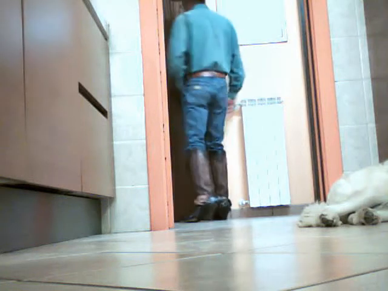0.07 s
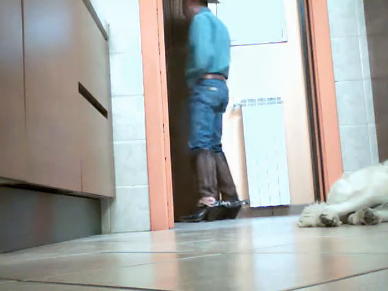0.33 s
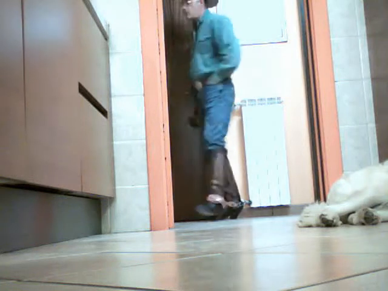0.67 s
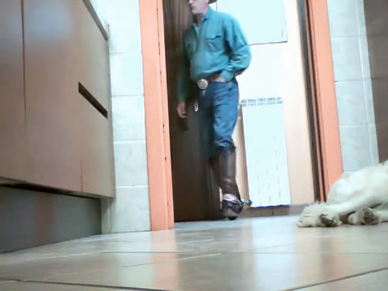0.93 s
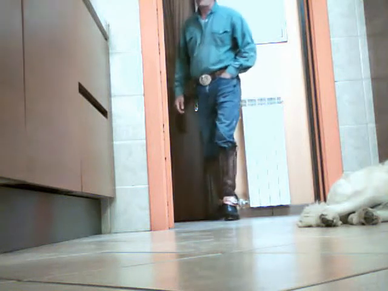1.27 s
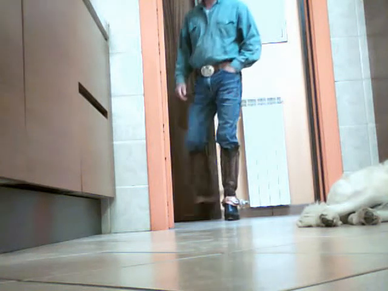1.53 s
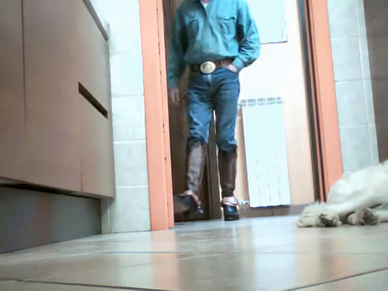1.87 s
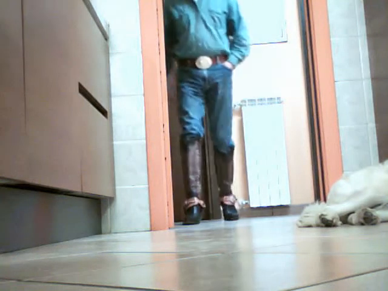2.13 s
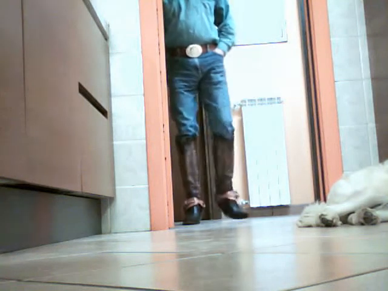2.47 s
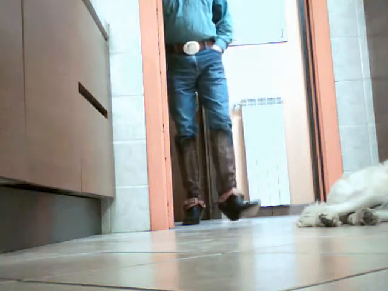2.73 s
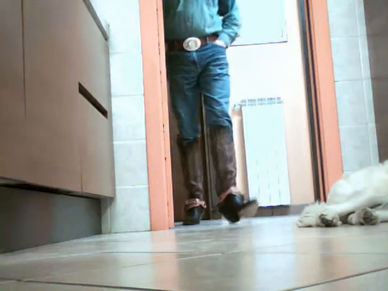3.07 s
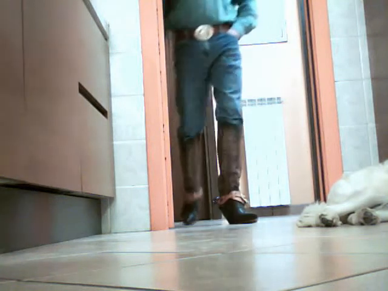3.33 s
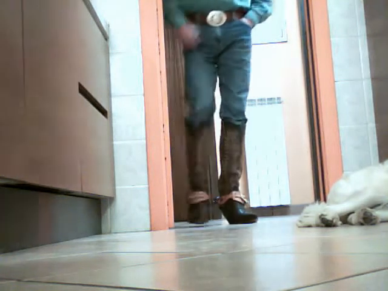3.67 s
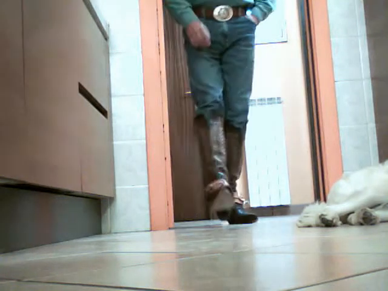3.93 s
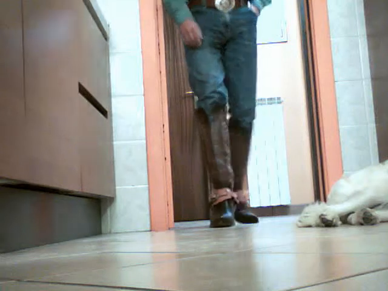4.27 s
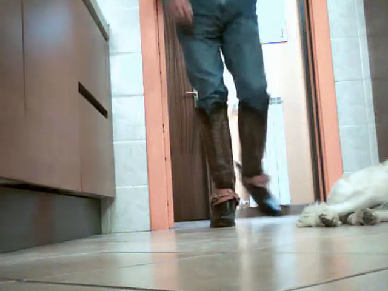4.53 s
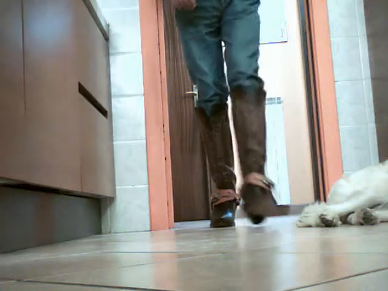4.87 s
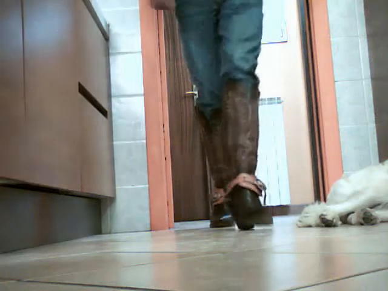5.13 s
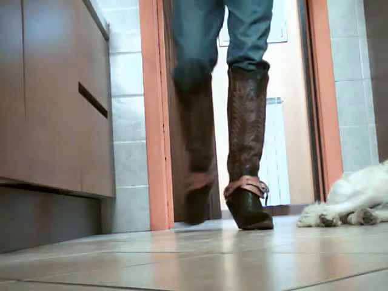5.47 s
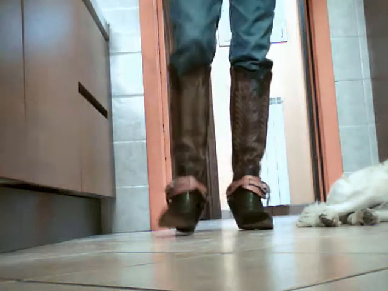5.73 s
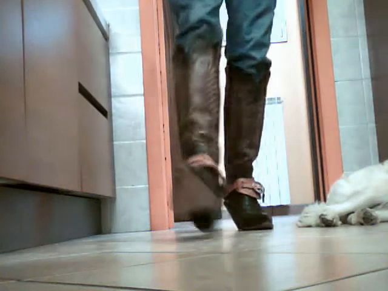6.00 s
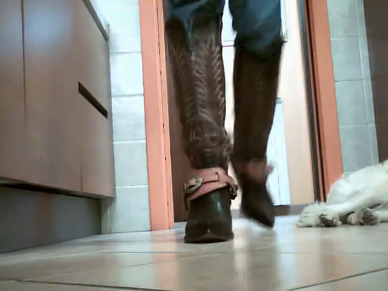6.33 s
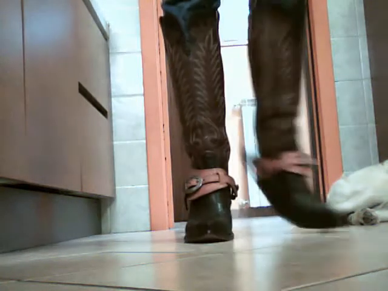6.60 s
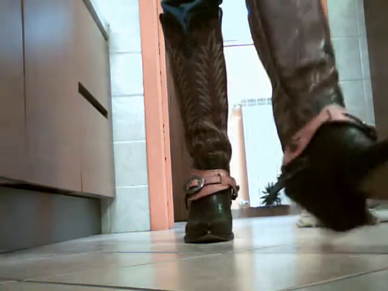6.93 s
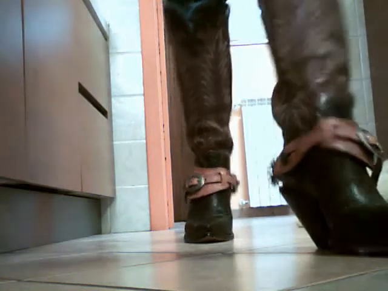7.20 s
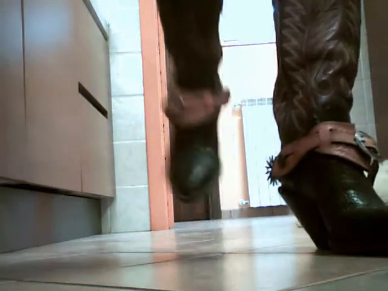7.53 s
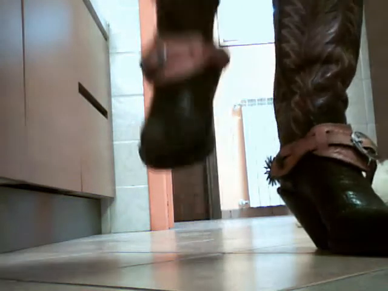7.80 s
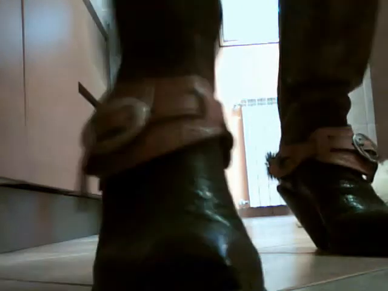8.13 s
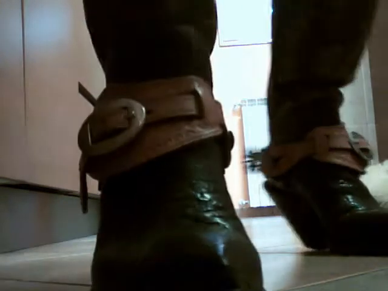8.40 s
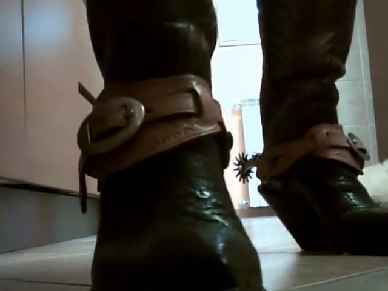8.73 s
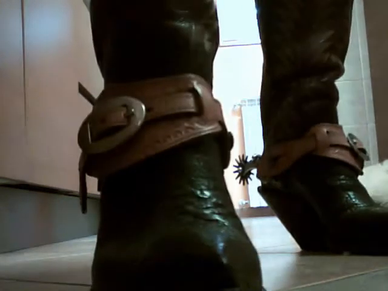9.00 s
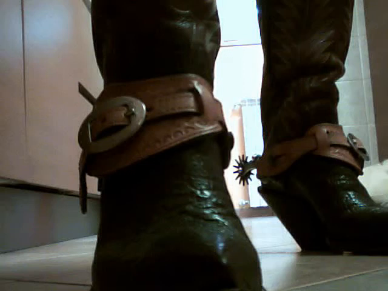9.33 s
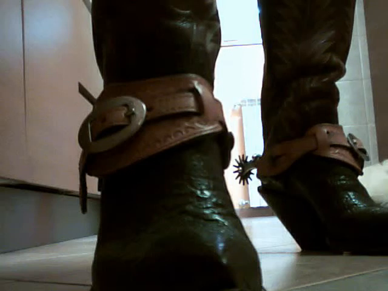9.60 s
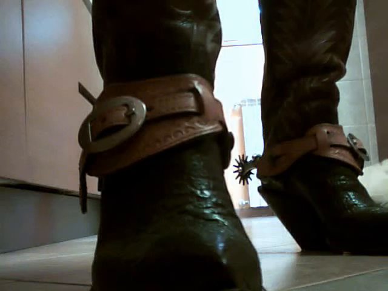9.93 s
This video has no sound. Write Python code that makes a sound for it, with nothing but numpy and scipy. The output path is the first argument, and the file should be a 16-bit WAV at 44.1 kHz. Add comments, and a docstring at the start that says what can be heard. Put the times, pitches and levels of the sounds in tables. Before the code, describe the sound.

Boots walk slowly over tiles in a small, echoing room, about one step a second. Each heel thumps, loose metal spurs clack and their wheels ring with a thin, high tone, while leather rustles faintly. The steps grow louder as they near the microphone and end in one very loud, distorted stamp. The spurs rattle and ring out, leaving a low, steady hiss.

```python
"""Riding boots with spurs walk slowly over tiles towards the microphone and stamp in front of it.
Each heel thumps, the loose spurs clack on the boots, and their two star-shaped wheels ring near 6 kHz.
The leather rustles as the boots bend, and the small, hard room echoes every knock.
The stamp overloads the microphone's input, whose steady hiss lies under everything."""
import sys
import numpy as np
from scipy import signal
from scipy.fft import rfft, irfft
from scipy.io import wavfile

SR = 44100
rng = np.random.default_rng(int(sys.argv[2]) if len(sys.argv) > 2 else 0)


def dump(signal):
    """Clip the signal to [-1, 1] and save it as 16-bit WAV at the path in sys.argv[1]."""
    limited = np.clip(np.atleast_2d(signal).T, -1, 1)
    pcm = np.round(limited * 32767).astype(np.int16)
    wavfile.write(sys.argv[1], SR, pcm)


N = 439677
TIME = np.arange(N) / SR
AGE = np.arange(int(.8 * SR)) / SR   # seconds since a knock began

# Levels in the tables are relative: the functions add their own gains.
# the tone of the hiss: pitch_hz, level_db
HISS_SHAPE = [(20, 3), (80, 6), (125, -5), (250, 3.5), (700, 1), (1300, -0.5), (4500, -1.5), (7000, -3.5),
              (7600, -10.5)]
# a faint, steady whine: pitch_hz, width_hz, level_db
WHINE_BANDS = [(869.7, 17, -65.5), (1763, 5.6, -69.5)]
# notes that linger between the walls (standing waves): pitch_hz, level_db
ROOM_NOTES = [(152, -35), (220, -24), (277, -25.5), (433, -28)]
# how far away the walker is: time_s, distance_m
WALK_PATH = [(0, 5), (3.2, 6.2), (4.3, 6.1), (5.3, 2.1), (6.2, 2.9), (7.3, 1.35), (8.3, 2.4)]
# a boot bends as the weight rolls onto it: deepest_bend_s, level_db
BOOT_BENDS = [(0.3, -45), (1.33, -52.5), (2.32, -44.5), (3.4, -49.5), (4.38, -40), (5.42, -40.5),
              (6.33, -40), (7.35, -40.5)]
# the tone of rustling leather and buckles: pitch_hz, width_hz, level_db
LEATHER_BANDS = [(665, 1050, -14.5), (1620, 2750, -5.5), (2880, 1930, -1.5), (3640, 680, -3.5),
                 (4370, 5600, -15), (7140, 3000, -21)]
# flicks that set each spur's wheel ringing: start_s, level_db, high_over_low_db, base_ring_s
RIGHT_WHEEL_FLICKS = [(0.078, -47.5, 2, 0.45), (0.223, -49.5, -1, 0.73), (0.717, -52.5, 4, 0.54),
                      (1.1, -63, 12, 3), (1.752, -56, 4, 2.5), (2.375, -50.5, -2, 2.6),
                      (3.762, -48.5, -1, 0.93), (4.48, -53.5, 12, 2.2), (5.50, -57.5, -11, 0.61),
                      (5.70, -52, 10, 4.6), (7.68, -58, -7.5, 2.4), (7.946, -44.5, -5.5, 0.85),
                      (8.195, -48, -1, 0.76), (8.275, -40, -3, 2.93), (8.583, -41.5, 4.5, 0.77)]
LEFT_WHEEL_FLICKS = [(0.748, -48, 7, 0.82), (1.241, -50, 7, 2.3), (1.53, -47, 4, 3.2),
                     (2.87, -45.5, -5, 2.2), (3.466, -42.5, 2, 2.3), (4.728, -47, -2, 1.5),
                     (6.003, -43, 9.5, 2.1), (6.26, -44.5, -5.5, 2), (6.738, -42.5, 0.5, 2.6),
                     (7.025, -43, -3, 0.9)]
# each wheel's notes: pitch_hz, level_db, ring_share, side (-1 low, 0 middle, 1 high)
RIGHT_WHEEL_NOTES = [(5761, 0, 1, -1), (5800, -3, .3, 0), (5874, 0, .75, 1)]
LEFT_WHEEL_NOTES = [(5924, 0, 1, -1), (5948, -4, .5, -1), (6107, 0, 1, 1), (6140, -4, .45, 1)]
# a spur knocks on its boot: start_s, level_db, strap_db, shank_db, edge_db (last three add to level_db)
SPUR_KNOCKS = [(0.079, -35, -11, 0.5, -9), (0.223, -32.5, -20, 3, -15), (0.2356, -37, -10, -2, -4),
               (0.7377, -33.5, -11, 3.5, -7), (1.1237, -36, -15, -5, -13), (1.241, -38.5, -5, 0, -10),
               (1.466, -36, -20, -1, -8), (1.5138, -39, -13, -5, -15), (2, -38, -14, -1, -8),
               (2.146, -34.5, -25, -2, -7), (2.192, -24.5, -17, -9, -16), (2.2717, -27, -14.5, -8, -17),
               (2.375, -33.5, -8.5, -3.5, -9), (2.6352, -38.5, -20, -6, -17), (2.7965, -45, -14, -0.5, -19),
               (3.2152, -25.5, -11.5, 2, -8.5), (3.465, -33.5, -6.5, 0.5, -11), (3.5482, -41, 1, 2.5, 2.5),
               (3.761, -34, -14, -2, -8), (4.2015, -28, -11.5, -7, -12), (4.2591, -24.5, -13, -9, -15.5),
               (4.3067, -26.5, -12, -7, -8.5), (4.478, -34.5, -9, -0.5, -6), (4.728, -36, -19, -10, -10),
               (5.089, -42, -2.5, -1, -15), (5.2017, -37, -2.5, -6, -21), (5.226, -31, -23, -7, -15),
               (5.268, -16.5, -15.5, -15, -22), (5.3615, -19, -18, -25, -20),
               (5.4831, -19.5, -18, -19, -18), (5.6153, -27.5, -30, -28, -35), (5.6576, -22, -38, -21, -29),
               (5.7003, -32.5, -8.5, -2, -3), (5.899, -32.5, -16, -5, -6), (5.949, -39, 0.5, -11, -6),
               (6.0032, -25, -6, -4, -26.5), (6.0182, -23.5, -15.5, -19, -20),
               (6.2127, -16.5, -12.5, -6.5, -14.5), (6.26, -24, -8.5, -3, -10),
               (6.2902, -24.5, -8, -9, -12), (6.3527, -25.5, -5.5, -3.5, -7.5), (6.435, -30, -27, -21, -12),
               (6.5844, -36, -28, -16, -5), (6.7423, -35, -2, -8, -4.5), (6.789, -31, -10, -2.5, -13.5),
               (6.941, -37, -6, -17.5, -31), (7.0247, -31, -11, -5.5, -17), (7.1423, -33, -9, -4, -28),
               (7.197, -16, -18, -6, -14), (7.224, -25.5, -33, -4, -24), (7.2533, -23, -15, -17, -22),
               (7.2669, -21.5, -13, -17.5, -17), (7.2987, -20, -11, -22, -19), (7.3212, -24.5, -18, -8, -5),
               (7.3632, -14.5, -18, -28, -12), (7.9463, -31, -1.5, -4.5, -6),
               (8.1948, -32.5, -7.5, 1.5, -6.5), (8.4297, -13.5, -21, -25, -30.5),
               (8.5814, -20.5, -11, -7, -15)]
# how each part of a spur rings: pitch_hz, width_hz, level_db
YOKE_BANDS = [(3276, 330, -.5), (3617, 340, -0.013)]   # the metal band around the heel
STRAP_BANDS = [(1010, 600, -2), (1800, 450, 0)]
SHANK_BANDS = [(2715, 840, 0.005)]   # the arm that holds the wheel
EDGE_BANDS = [(3790, 270, -1), (4886, 600, 6), (7270, 640, -6.5)]
# a heel lands on tile: start_s, level_db, pitch_hz, knock_db, echo_db (last two add to level_db)
HEEL_STEPS = [(0.388, -45.5, 277, -16, 5.5), (1.096, -46, 170, -11, -0.5), (1.281, -47, 374, -19, 5),
              (2.134, -37.5, 218, -14, 11), (3.203, -32.5, 302, -13, 2), (3.354, -40, 357, -23, -0.5),
              (4.186, -28.5, 210, -20, 7), (5.199, -31.5, 151, -9, 5.5), (6.195, -29, 146, -0.5, 1),
              (7.188, -27.5, 180, -1, 3), (8.193, -54.5, 400, 15.5, -4)]
# the stamp's hits (heel, sole, then rattling spur): start_s, thud_db, spur_db
STAMP_HITS = [(8.2642, -5, -16.5), (8.269, -11, 2), (8.276, -13, 2), (8.288, -17, -12.5), (8.301, -22.5, 0)]
# the tone of the stamp's thud: pitch_hz, width_hz, level_db
THUD_BANDS = [(86, 45, -17), (218, 86, -1.5), (447, 190, -1.5), (950, 550, -1.5), (1553, 450, -3),
              (2800, 850, -2), (5760, 3100, -11)]


def from_db(db):
    """Turns decibels into a factor to multiply a sound by."""
    return 10 ** (np.asarray(db) / 20)


def unit_level(sound):
    """Scales a sound to an average (RMS) level of one."""
    return sound / np.sqrt(np.mean(sound ** 2) + 1e-20)


def fade(t, fade_s):
    """A curve that falls by 60 dB every fade_s seconds."""
    return np.exp(-np.log(1000) * t / fade_s)


def add(out, start_s, sound):
    """Mixes a sound in at its start time."""
    at = int(start_s * SR)
    out[at:at + len(sound)] += sound[:N - at]


def resonate(force, bands):
    """Makes an object ring in each band (pitch_hz, width_hz, level_db); the bands alternate in sign."""
    out = 0
    for k, (hz, width_hz, db) in enumerate(bands):
        decay = np.exp(-np.pi * width_hz / SR)
        gain = np.sqrt((1 - decay * decay) / 2) * from_db(db) * (-1) ** k
        feedback = [1, -2 * decay * np.cos(2 * np.pi * hz / SR), decay * decay]
        out = out + signal.lfilter([gain, 0, -gain], feedback, force + 1e-18)
    return out


def only(sound, hz, kind, order=2):
    """Lets only the lows, the highs or one band through."""
    return signal.sosfilt(signal.butter(order, hz, kind, fs=SR, output="sos"), sound)


def background_hiss(level_db=-51):
    """The input's even hiss, plus the faint whine of a fan in the room."""
    hz, db = np.transpose(HISS_SHAPE)
    all_hz = np.maximum(np.arange(N // 2 + 1) * SR / N, 1)
    shape = from_db(np.interp(np.log(all_hz), np.log(hz), db))
    hiss = unit_level(irfft(rfft(rng.standard_normal(N)) * shape, N))
    return from_db(level_db) * hiss + resonate(rng.standard_normal(N), WHINE_BANDS)


def bouncing_touch():
    """One hard thing meets another: a sharp touch, then two quick, weaker bounces."""
    force = signal.unit_impulse(len(AGE))
    for delay_s, strength in ((0.0027, 0.76), (0.0099, 0.71)):
        add(force, delay_s * rng.uniform(.6, 1.4), np.array([strength]))
    return force / np.linalg.norm(force)


def hit_in_room(start_s, echo_db, early_gain=1.6, early_s=0.11, late_s=0.68, build_s=0.0051):
    """A touch plus the room's echo, which grows with distance and differs from spot to spot."""
    wash = rng.standard_normal(len(AGE))
    wash += sum(from_db(db) * np.sin(2 * np.pi * (hz * AGE + rng.random())) for hz, db in ROOM_NOTES)
    # near walls answer first, then the tiles keep the sound going
    dying_away = early_gain * fade(AGE, early_s) + fade(AGE, late_s)
    echo = wash * dying_away * (1 - np.exp(-AGE / build_s))
    distance_m = np.interp(start_s, *np.transpose(WALK_PATH))
    return bouncing_touch() + from_db(echo_db) * distance_m ** 0.51 * echo / np.linalg.norm(echo)


def boot_bending(swell_s=0.22, release_s=0.99, settle_s=4.5, settle_db=-9, resting_db=-57):
    """How hard the leather works: it swells into each bend, lets go quickly and settles slowly."""
    effort = from_db(resting_db)
    for bend_s, db in BOOT_BENDS:
        since = np.maximum(TIME - bend_s, 0)
        swell = np.clip(1 + (TIME - bend_s) / swell_s, 0, 1)
        relax = np.hypot(fade(since, release_s), from_db(settle_db) * fade(since, settle_s))
        effort = np.hypot(effort, from_db(db) * swell * relax)
    return effort * (TIME < STAMP_HITS[0][0])   # still from the stamp on


def leather_rustle(ticks_per_s=260, spread_db=1.5, blur=2.04):
    """Leather creases and buckles shift in tiny ticks; added noise stands for the room's blur."""
    sizes = from_db(spread_db * np.minimum(rng.exponential(1, N), 4)) * rng.choice([-1, 1], N)
    ticks = unit_level(sizes * (rng.random(N) < ticks_per_s / SR))
    blurred = ticks + blur * rng.standard_normal(N)
    return boot_bending() * unit_level(resonate(blurred, LEATHER_BANDS))


def spur_wheel(flicks, notes, gain_db, wobble_depth=0.52, wobble_hz=18, ring_stretch=1.39):
    """A star wheel rings in a few close notes; it wobbles on its pin at first, then rings more evenly."""
    out, t = np.zeros(N), np.arange(2 * SR) / SR
    onset = 1 - np.exp(-t / 0.0041)
    for start_s, db, high_over_low_db, base_ring_s in flicks:
        for hz, note_db, ring_share, side in notes:
            wobble = unit_level(only(rng.standard_normal((2, len(t))), wobble_hz, "low"))
            # a complex factor shakes both loudness and phase
            swing = 1 + wobble_depth * fade(t, fade_s=4.5) * (wobble[0] + 1j * wobble[1])
            tone = np.real(swing * np.exp(2j * np.pi * (hz * t + rng.random())))
            gain = from_db(db + note_db + side * high_over_low_db / 2 + gain_db)
            add(out, start_s, gain * tone * onset * fade(t, base_ring_s * ring_share * ring_stretch))
    return out


def spur_rattles(per_bend=4, scatter_s=.06, lift_db=1.5, spread_db=2):
    """Each bend of a boot shakes a few small knocks out of its spur: rows like those of SPUR_KNOCKS."""
    strap_db, shank_db, edge_db = -12.5, -5, -8.5
    return [(bend_s + scatter_s * np.clip(late, -2, 2), db + lift_db + spread_db * strong,
             strap_db, shank_db, edge_db)
            for bend_s, db in BOOT_BENDS for late, strong in rng.standard_normal((per_bend, 2))]


def spur_clacks(gain_db=17.5):
    """The spur's yoke knocks on the boot; strap, shank and edges join in more or less each time."""
    yoke, strap, shank, edge = np.zeros((4, N))
    for start_s, db, strap_db, shank_db, edge_db in SPUR_KNOCKS + spur_rattles():
        force = from_db(db + gain_db) * hit_in_room(start_s, echo_db=-5.5, early_gain=1.0)
        for part, part_db in ((yoke, 0), (strap, strap_db), (shank, shank_db), (edge, edge_db)):
            add(part, start_s, from_db(part_db) * force)
    return (only(resonate(yoke, YOKE_BANDS), [2950, 4200], "band")
            + from_db(1.0) * only(resonate(strap, STRAP_BANDS), [650, 2400], "band")
            + from_db(2.5) * only(resonate(shank, SHANK_BANDS), [2300, 3100], "band")
            + from_db(-4.5) * only(resonate(edge, EDGE_BANDS), 3600, "high", order=4))


def heel_steps(thump_db=19.0, floor_db=13.5, damping=0.72):
    """The heel thumps at a pitch set by how it lands, the floor thuds, and a hard landing knocks."""
    out = np.zeros(N)
    for start_s, db, hz, knock_db, echo_db in HEEL_STEPS:
        force = hit_in_room(start_s, echo_db - 0.5, early_gain=0.39)
        thump = only(resonate(force, [(hz, damping * hz, thump_db)]), [.55 * hz, 1.84 * hz], "band")
        floor = only(resonate(hit_in_room(start_s, echo_db), [(146.6, 110, floor_db)]), [105, 300], "band")
        knock_bands = [(378, 82, knock_db + 16), (850, 560, knock_db + 15.5)]
        knock = only(resonate(hit_in_room(start_s, echo_db), knock_bands), [220, 1800], "band")
        add(out, start_s, from_db(db) * (thump + floor + knock))
    return out


def boot_stamp(thud_gain_db=18.5, spur_gain_db=17.0, air_hz=290):
    """The whole boot slams down, pushing out one heavy swing of air, and its spur rattles against it."""
    out = np.zeros(N)
    air_push = -np.sin(2 * np.pi * air_hz * AGE) * fade(AGE, fade_s=0.023)
    add(out, STAMP_HITS[0][0], air_push)
    for start_s, thud_db, spur_db in STAMP_HITS:
        thud = resonate(hit_in_room(start_s, echo_db=1.6), THUD_BANDS)
        spur = resonate(hit_in_room(start_s, echo_db=-0.076), [(3250, 590, 0.093), (3686, 720, -1.33)])
        add(out, start_s, from_db(thud_gain_db + thud_db) * thud + from_db(spur_gain_db + spur_db) * spur)
    return out


def scene():
    """Adds boots, spurs and hiss into one channel."""
    wheels = spur_wheel(RIGHT_WHEEL_FLICKS, RIGHT_WHEEL_NOTES, gain_db=4.0)
    wheels += spur_wheel(LEFT_WHEEL_FLICKS, LEFT_WHEEL_NOTES, gain_db=-4.0)
    return (heel_steps() + spur_clacks() + wheels + boot_stamp() + leather_rustle() + background_hiss())[None]


def record(dry, microphone_top_hz=7602, offset=-.0672, ceiling=.95, final_top_hz=14700):
    """A microphone with little treble feeds an off-centre input that overloads; the top is then cut."""
    microphone = signal.ellip(10, .3, 70, microphone_top_hz, fs=SR, output="sos")
    off_centre = signal.sosfilt(microphone, dry) + offset
    clipped = off_centre / (1 + np.abs(off_centre / ceiling) ** 7) ** (1 / 7)   # flattens the stamp
    return signal.sosfilt(signal.ellip(12, .1, 80, final_top_hz, fs=SR, output="sos"), clipped)


dry = scene()
out = record(dry)
dump(out)
```